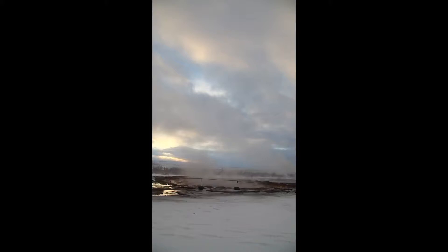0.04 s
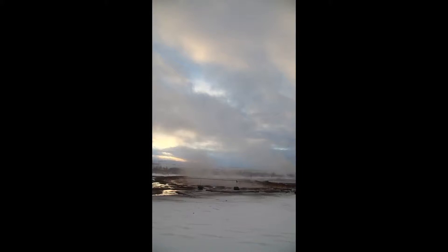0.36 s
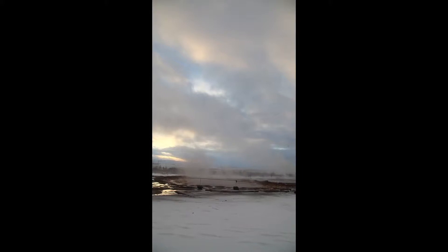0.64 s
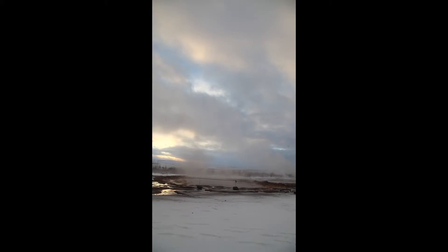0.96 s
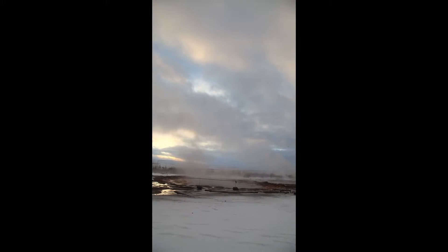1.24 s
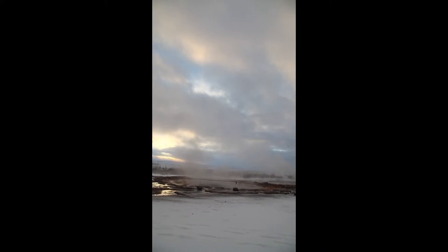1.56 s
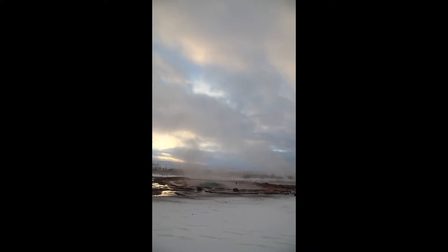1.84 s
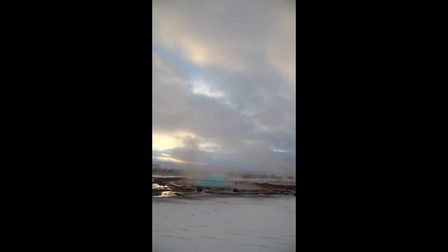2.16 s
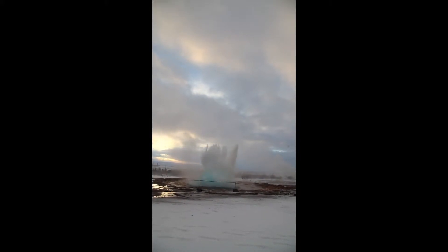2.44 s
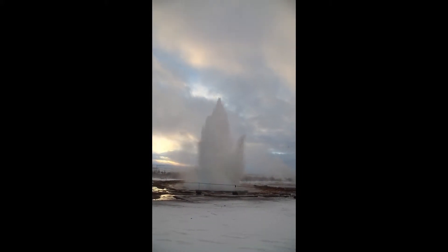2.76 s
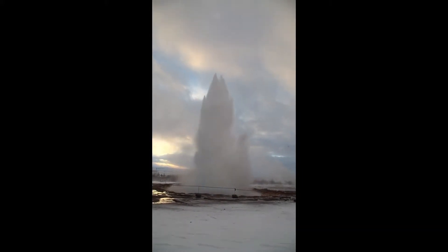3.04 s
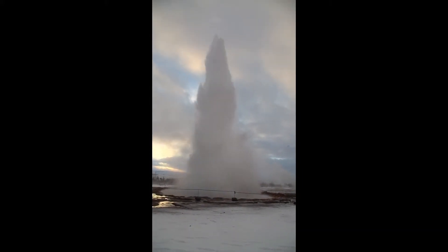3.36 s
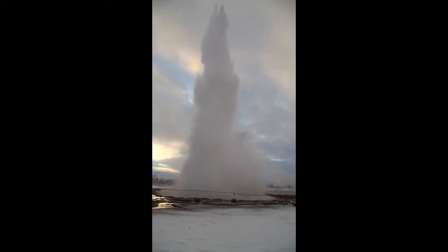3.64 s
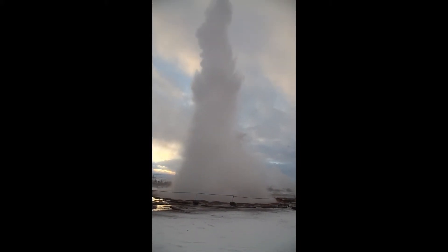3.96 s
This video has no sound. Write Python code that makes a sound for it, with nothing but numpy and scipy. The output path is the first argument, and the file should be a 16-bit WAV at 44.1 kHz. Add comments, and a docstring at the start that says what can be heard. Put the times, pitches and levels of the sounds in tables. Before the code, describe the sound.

A geyser erupts on an open plain. First a small camera mechanism whirrs and ticks right at the microphone over faint wind; then the water bursts with deep thuds, roaring upward and hissing as it slowly eases.

```python
"""An open plain with a geyser, heard in mono through the microphone of a small camera.
Right at the microphone a mechanism whirrs and ticks in the camera's housing, over faint wind.
Some two seconds in, out on the plain, the pool heaves and bursts: steam pockets thud,
the water column roars upward and its spray hisses as the roar sinks."""
import sys
import numpy as np
from scipy import signal
from scipy.fft import rfft, irfft
from scipy.io import wavfile

SR = 44100
rng = np.random.default_rng(int(sys.argv[2]) if len(sys.argv) > 2 else 0)


def generate_wav(sig):
    """Save sig (samples, or channels by samples) to the path in sys.argv[1] as 16-bit PCM at SR."""
    pcm = np.round(np.clip(np.atleast_2d(sig).T, -1, 1) * 32767).astype(np.int16)
    wavfile.write(sys.argv[1], SR, pcm)


N = 176400
T = np.arange(N) / SR


def from_db(db):
    """Decibels to gain."""
    return 10 ** (np.asarray(db) / 20)


def rms_one(x):
    """Scale to an rms of 1."""
    return x / np.sqrt(np.mean(x ** 2) + 1e-20)


def level(rows):
    """Gain over time from (s, dB) rows."""
    return from_db(np.interp(T, *np.transpose(rows)))


def drift(rate_hz):
    """Slow random wander with a spread of 1."""
    hop, settle = 40, 2000
    pole = np.exp(-2 * np.pi * rate_hz * hop / SR)
    noise = rng.standard_normal(N // hop + settle + 2)
    slow = signal.lfilter([1], [1, -2 * pole, pole * pole], noise)[settle:]
    return np.interp(np.arange(N) / hop, np.arange(len(slow)), rms_one(slow))


def colour(x, spectrum):
    """Filter by a spectrum of (Hz, dB) points, falling away beyond both ends; rms 1."""
    hz, db = np.transpose(spectrum)
    freqs = np.maximum(np.arange(N // 2 + 1) * SR / N, 1)
    gain = from_db(np.interp(np.log(freqs), np.log(hz), db))
    skirts = np.minimum(freqs / hz[0], 1) * np.minimum(hz[-1] / freqs, 1) ** 4
    return rms_one(irfft(rfft(x) * gain * skirts, N))


def clicks(per_s, spread_db):
    """Random impacts of uneven size; rms 1."""
    sizes = from_db(spread_db * np.minimum(rng.exponential(1, N), 5))
    signs = rng.choice([-1, 1], N)
    return rms_one(sizes * signs * (rng.random(N) < per_s / SR))


def turbulence(spectrum, surge_db, rate_hz):
    """Coloured noise whose level wanders at random by surge_db; rms 1."""
    return colour(rng.standard_normal(N) * from_db(surge_db * drift(rate_hz)), spectrum)


def pulses(rows, t60_s, rise_s):
    """Low pressure pulses that swing a few times and die."""
    out = np.zeros(N)
    for start, db, hz in rows:
        age = np.maximum(T - start, 0)
        envelope = (1 - np.exp(-age / rise_s)) * np.exp(-np.log(1000) * age / t60_s)
        out -= from_db(db) * envelope * np.sin(2 * np.pi * hz * age)
    return out


# Wind on the plain. Each row: frequency in Hz, relative level in dB.
WIND_SPECTRUM = [(20, -3), (55, -0.5), (105, 0.5), (145, 2), (200, 2), (330, -2), (900, -10), (1800, -14),
                 (4500, -21.5), (7500, -23.5), (9000, -27), (15500, -31.5)]

def wind():
    """Faint, nearly steady air, strongest in the bass."""
    return from_db(-49) * turbulence(WIND_SPECTRUM, surge_db=0.3, rate_hz=29)


# Faint electronics near the microphone. Each row: frequency in Hz, rms level in dB.
WHINE_TONES = [(4880, -76), (6835, -77), (12695, -81), (15662, -72)]

def whines():
    """The electronics give off thin, steady tones."""
    return sum(from_db(db) * np.sqrt(2) * np.sin(2 * np.pi * hz * T) for hz, db in WHINE_TONES)


# The housing around the microphone. Each row: resonance in Hz, width in Hz, gain in dB.
HOUSING_MODES = [(502.5, 77, 0.5), (651, 110, -8), (793, 110, -10.5), (1030, 90, -18.5), (1169, 65, 2.5),
                 (1414.6, 57.6, 2.5), (1700, 98, -22), (2006, 160, -14), (2220, 150, -10), (2392, 55, -6),
                 (2486, 106, -4), (2750, 130, -10), (2800, 54, -17), (3220, 160, -20), (3540, 120, -45),
                 (3806, 99, -20.5)]

def housing(force):
    """A force rings the housing's resonances in parallel, each filtered twice for steep flanks."""
    out = 0
    for hz, width, db in HOUSING_MODES:
        radius = np.exp(-np.pi * width / SR)
        gain = (1 - radius ** 2) / 2
        section = [gain, 0, -gain, 1, -2 * radius * np.cos(2 * np.pi * hz / SR), radius ** 2]
        out = out + from_db(db) * signal.sosfilt([section, section], force + 1e-18)
    return out


# The mechanism, right at the microphone. Each row: time in seconds, relative level in dB.
WHIRR_LEVELS = [(0.14, -44.5), (0.23, -41), (0.26, -43.5), (0.27, -38), (0.3, -44), (0.32, -42),
                (0.51, -40), (0.65, -37.5), (0.67, -48.5), (0.72, -40.5), (1.0, -40), (1.01, -43),
                (1.07, -41), (1.1, -42.5), (1.14, -40.5), (1.18, -44), (1.52, -38), (1.68, -44),
                (1.69, -38), (1.77, -40.5), (1.88, -42), (1.9, -47), (1.92, -39), (2.14, -45)]

def whirr(stop_s=2.14, fade_s=0.025, gain_db=0.46, flutter_db=0):
    """Dense small contacts in the mechanism shake the housing, then stop."""
    grind = clicks(per_s=1500, spread_db=1.83)
    fade = np.clip(1 - (T - stop_s) / fade_s, 0, 1)
    drive = level(WHIRR_LEVELS) * from_db(gain_db + flutter_db * drift(rate_hz=45)) * fade
    return housing(grind * drive) / np.std(housing(grind))


# Sharper ticks, just as close. Each row: start in seconds, relative strength in dB.
TICK_STRIKES = [(0.1287, -44), (0.1973, -41), (0.2054, -45), (0.2245, -42), (0.2352, -44), (0.2618, -44.5),
                (0.313, -41), (0.3626, -44), (0.4018, -41.5), (0.455, -45), (0.5318, -42.5),
                (0.5558, -42.5), (0.6162, -40.5), (0.7485, -42), (0.8391, -47), (0.8502, -44),
                (0.882, -45.5), (0.9615, -41), (1.1305, -40.5), (1.3883, -43), (1.4764, -43), (1.542, -42),
                (1.6007, -43), (1.6862, -37.5), (1.7347, -41), (1.824, -41), (1.8674, -41.5),
                (1.9665, -42.5), (2.0267, -43), (2.0668, -42), (2.1107, -44.5)]
# Their own bright ring. Each row: frequency in Hz, relative level in dB.
TICK_SPECTRUM = [(600, 0.5), (1200, 15.5), (1700, 4), (2500, 10.5), (3050, -3), (3500, 1.5), (3850, 5),
                 (4050, -6), (5000, -10.5), (5800, -7), (6400, -14), (6900, -5), (7400, -2), (7900, -26),
                 (12000, -24), (16000, -35)]

def ticks(decay_s=0.0015, rebound_s=0.0052, rebound_db=-2):
    """Each tick is a brief scrape and a rebound; it knocks the housing and rings brightly."""
    strikes = np.zeros(N)
    for start, db in TICK_STRIKES:
        rebound = start + rebound_s * rng.uniform(0.8, 1.2)
        strikes[int(start * SR)] += from_db(db)
        strikes[int(rebound * SR)] += from_db(db + rebound_db)
    envelope = signal.lfilter([1], [1, -np.exp(-1 / (decay_s * SR))], strikes + 1e-18)
    scrape = envelope * rng.choice([-1, 1], N)
    knock = from_db(-50.5) * rms_one(housing(scrape))
    ring = from_db(-53) * colour(scrape, TICK_SPECTRUM)
    return knock + ring


# Bumps on the microphone. Each row: start in seconds, level in dB, pitch in Hz.
MIC_BUMPS = [(.677, -27.5, 109), (.680, -31.5, 264), (.705, -29.5, 149), (1.945, -35.5, 95),
             (2.193, -24, 158)]

def bumps():
    """Air or handling nudges the camera with a few dull bumps."""
    return pulses(MIC_BUMPS, t60_s=0.066, rise_s=0.0005)


# The rumble from the vent, out on the plain. Each row: time in seconds, level in dB.
RUMBLE_LEVELS = [(1.75, -90), (1.96, -51.5), (2.16, -58), (2.24, -35), (2.30, -23.5), (2.35, -13.5),
                 (2.44, -20.5), (2.52, -18.5), (2.61, -20.5), (2.78, -19.5), (3.12, -27.5), (3.5, -29.5),
                 (4.0, -35)]
# Its tone. Each row: frequency in Hz, relative level in dB.
RUMBLE_SPECTRUM = [(40, -32), (95, -6.5), (135, -2.5), (175, 0), (205, -1.5), (250, -1.5), (305, -10),
                   (355, -4.5), (430, -15.5), (800, -48)]

def rumble():
    """The pool heaves and bursts with a low rumble."""
    return level(RUMBLE_LEVELS) * turbulence(RUMBLE_SPECTRUM, surge_db=1.0, rate_hz=35)


# The column above the vent, heard from the camera. Each row: time in seconds, level in dB.
ROAR_LEVELS = [(1.8, -90), (2.0, -44), (2.17, -42), (2.24, -32), (2.31, -25), (2.36, -20.5), (2.44, -26.5),
               (2.52, -24), (2.8, -22.5), (3.1, -27), (3.45, -28), (4.0, -31)]
# Its tone. Each row: frequency in Hz, relative level in dB.
ROAR_SPECTRUM = [(150, 1), (380, -6.5), (560, -1), (740, -5), (920, -4), (1020, -8), (1200, -2), (1370, -3),
                 (1490, -13.5), (1750, -9), (2200, -6), (2700, -11), (3500, -17.5), (4800, -31.5),
                 (8000, -42)]

def roar():
    """The turbulent water column roars upward, then slowly quietens."""
    return level(ROAR_LEVELS) * turbulence(ROAR_SPECTRUM, surge_db=1.02, rate_hz=12)


# The deepest sound to reach the microphone from the vent. Each row: time in seconds, level in dB.
BOOM_LEVELS = [(2.05, -92), (2.2, -49), (2.3, -25.5), (2.36, -28), (2.45, -24), (2.53, -23.5), (2.63, -40),
               (2.82, -23.5), (3.1, -35), (3.4, -37), (3.6, -42.5), (4.0, -43)]
# Its tone. Each row: frequency in Hz, relative level in dB.
BOOM_SPECTRUM = [(20, -9), (42, -2), (60, 4), (85, 4.5), (115, 1), (170, -22)]

def boom():
    """The vent booms in a few swells of deep noise."""
    return level(BOOM_LEVELS) * turbulence(BOOM_SPECTRUM, surge_db=0, rate_hz=100)


# Spray around the column. Each row: time in seconds, level of the hiss in dB.
SPRAY_LEVELS = [(2.1, -92), (2.225, -54), (2.252, -36), (2.295, -44.5), (2.37, -31.5), (2.46, -35.5),
                (2.7, -33), (2.84, -33), (3.08, -35.5), (3.35, -33), (3.65, -34.5), (4.0, -38)]
# The tone of hiss and drops alike. Each row: frequency in Hz, relative level in dB.
SPRAY_SPECTRUM = [(1200, -3), (2500, 1.5), (3200, 2.5), (3900, 2), (4800, -1), (6200, -0.5), (7400, 0),
                  (8300, -4), (10000, -14), (12000, -24), (15500, -36)]

def spray():
    """Spray hisses over a softer patter of drops."""
    drops = from_db(-12) * colour(clicks(per_s=3000, spread_db=5.5), SPRAY_SPECTRUM)
    hiss = turbulence(SPRAY_SPECTRUM, surge_db=0.5, rate_hz=26)
    return level(SPRAY_LEVELS) * (hiss + drops)


# The jet at the foot of the column. Each row: time in seconds, level in dB.
JET_LEVELS = [(2.15, -90), (2.3, -50), (2.5, -31), (2.68, -29.5), (2.85, -29), (3.05, -37.5), (3.4, -37.5),
              (4.0, -60)]
# Its tone. Each row: frequency in Hz, relative level in dB.
JET_SPECTRUM = [(200, -31), (600, -12), (900, 3.5), (1050, 6), (1300, -2), (1500, -12), (2000, -3),
                (3200, -2), (4200, -9.5), (6000, -14), (8500, -28)]

def jet():
    """The jet leaves the pool with a swelling rush."""
    return level(JET_LEVELS) * turbulence(JET_SPECTRUM, surge_db=1.9, rate_hz=45)


# Steam pockets out at the vent. Each row: start in seconds, level in dB, pitch in Hz.
STEAM_BURSTS = [(2.313, -6, 101), (2.356, -26, 142), (2.377, -3, 97), (2.398, 2, 113), (2.449, -17, 88),
                (2.529, -20, 142), (2.775, -17, 105), (2.87, -11, 126)]

def steam_thuds():
    """Each pocket of steam bursts with a short, low pressure pulse."""
    return pulses(STEAM_BURSTS, t60_s=0.052, rise_s=0.0018)


def scene():
    """The camera's own sounds, the geyser beyond and the wind, alike in both channels."""
    camera = whines() + whirr() + ticks() + bumps()
    geyser = boom() + rumble() + roar() + jet() + spray() + steam_thuds()
    return np.tile(camera + geyser + wind(), (2, 1))


def record(dry):
    """The microphone opens just after the start; the highest peaks are rounded and the top is cut."""
    open_s, ceiling, cutoff_hz = 0.1162, 0.74, 15900
    rounded = dry / (1 + (dry / ceiling) ** 4) ** (1 / 4)
    lowpass = signal.ellip(12, 0.1, 80, cutoff_hz, fs=SR, output="sos")
    return signal.sosfilt(lowpass, rounded * (T >= open_s) + 1e-18)


dry = scene()
out = record(dry)
generate_wav(out)
```